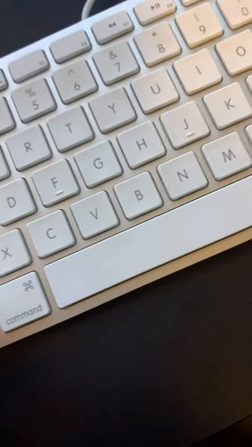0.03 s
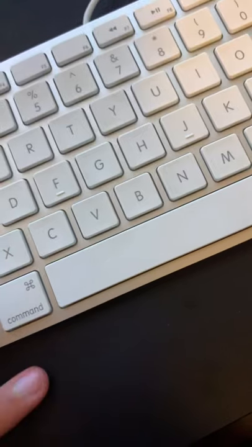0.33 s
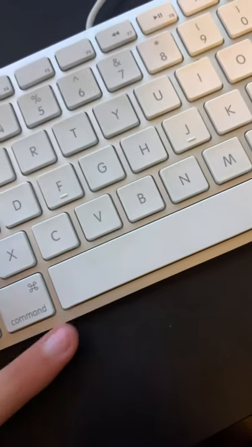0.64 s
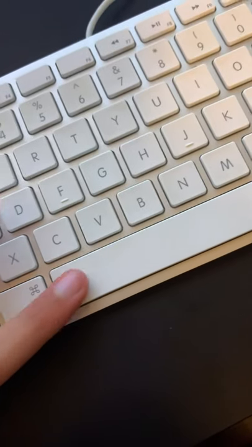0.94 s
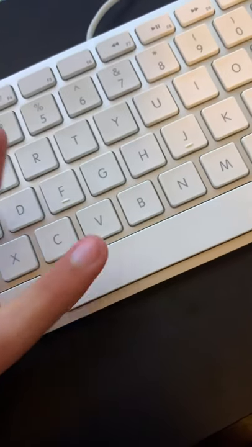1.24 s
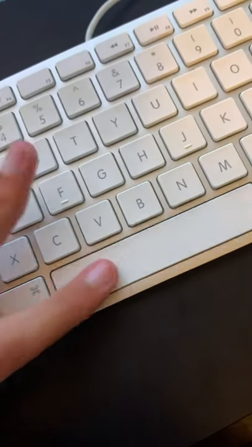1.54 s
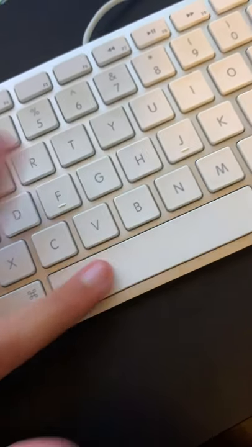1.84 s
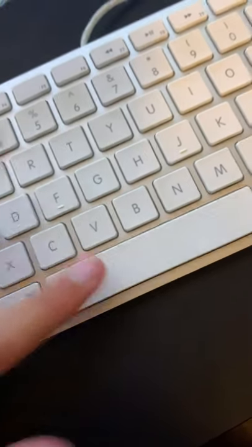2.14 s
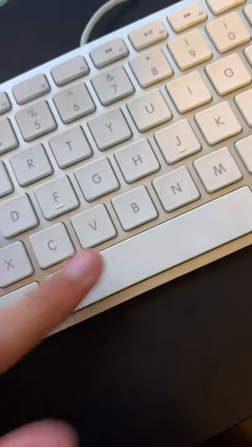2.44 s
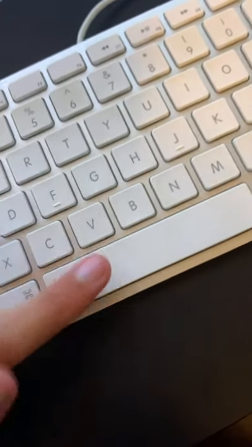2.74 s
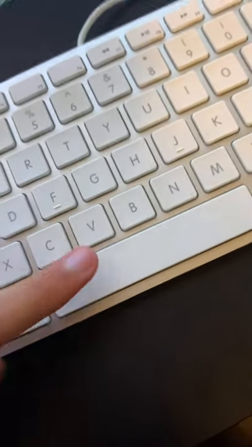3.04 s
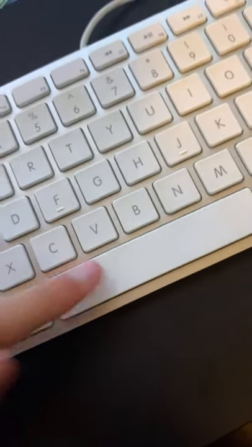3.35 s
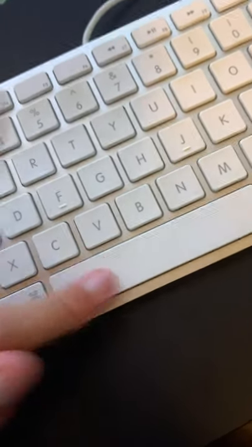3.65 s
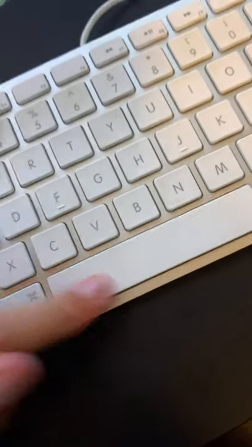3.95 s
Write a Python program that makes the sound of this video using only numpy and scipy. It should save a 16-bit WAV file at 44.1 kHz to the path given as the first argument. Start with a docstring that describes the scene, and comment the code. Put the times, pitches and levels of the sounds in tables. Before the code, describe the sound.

After a faint rustle and some soft knocks, a space bar is struck over and over at a quick, even pace. The close microphone catches plastic clacks, lighter return clicks and dull desk thumps in a quiet room.

```python
"""In a small quiet room, a finger taps the space bar of a flat desk keyboard 17 times, about six a second.
Each stroke is a series of impacts: the fingertip lands with a faint rattle, the bar clacks down, then
springs back with a lighter click. Clack and click excite the short plastic modes of the bar and the
low modes of the desk, heard as thumps. Before the typing come a short rustle, four soft knocks, two
tiny ticks and a brief hum. The impacts reverberate over a low room rumble."""
import sys
import numpy as np
from scipy import signal
from scipy.fft import rfft, irfft
from scipy.io import wavfile

SR = 44100
rng = np.random.default_rng(int(sys.argv[2]) if len(sys.argv) > 2 else 0)


def unload_audio(sound):
    """Save the sound as a 16-bit wav file, at the path given as the first command line argument."""
    columns = np.transpose(np.atleast_2d(sound))
    # keep every value between -1 and 1, then stretch to whole-number steps
    steps = np.round(np.clip(columns, -1, 1) * 32767)
    wavfile.write(sys.argv[1], SR, steps.astype(np.int16))


N = 176400
TIME = np.arange(N) / SR

# Levels in the tables are relative.
# the bar hits bottom: t/s, clack/dB, brightness/dB, thump/dB, lead of the fingertip/s, landing/dB
DOWNSTROKES = [(1.3831, -31, -1, -38.5, 0.01, -38), (1.5642, -31, -1.5, -39, 0.0065, -38.5),
               (1.729, -29.5, -3, -41, 0.006, -37), (1.883, -26, 1, -34, 0.0066, -36.5),
               (2.0473, -30, 7.5, -33, 0.0065, -37.5), (2.2058, -31, 4, -35.5, 0.0071, -41.5),
               (2.36, -33, -2, -35.5, 0.0066, -40), (2.5175, -31.5, 4.5, -36, 0.0073, -40.5),
               (2.6731, -34.5, -2, -39, 0.0073, -39.5), (2.8357, -35, 4.5, -41.5, 0.012, -44),
               (2.9924, -31.5, 5, -40.5, 0.0088, -43.5), (3.143, -31.5, 1, -37.5, 0.0086, -43.5),
               (3.2991, -29, 1.5, -37, 0.0078, -41.5), (3.454, -30.5, -1.5, -37.5, 0.007, -43),
               (3.6171, -30, -1, -40, 0.008, -40), (3.7741, -30.5, -1, -39.5, 0.0079, -38.5),
               (3.9173, -30, -4, -39.5, 0.0077, -41)]
# the bar springs back: t/s, click/dB, brightness/dB, thump/dB
UPSTROKES = [(1.4642, -35, -3, -33.5), (1.6305, -34, -3, -31.5), (1.7834, -34.5, -4, -33.5),
             (1.9535, -36.5, -0.5, -33), (2.1132, -34.5, -1, -34.5), (2.269, -36, -4.5, -33),
             (2.4213, -37, 0.5, -33.5), (2.5766, -37.5, -3.5, -35.5), (2.729, -36.5, 0, -39),
             (2.89, -35.5, -4.5, -38.5), (3.0514, -39, 3, -41.5), (3.209, -36.5, -1, -38),
             (3.365, -36.5, 2, -37), (3.524, -36.5, 1, -33.5), (3.681, -33.5, -0.5, -34),
             (3.8353, -34, 2, -35), (3.9806, -35.5, 1.5, -33)]
# modes of the plastic bar: f/Hz, T60/s, level/dB
PLASTIC_MODES = [(1220, 0.15, -20.5), (1340, 0.057, -14), (1670, 0.11, -13), (2480, 0.011, -15),
                 (2930, 0.0068, -8), (3750, 0.021, -20), (4020, .025, 2), (5110, 0.02, 6.5),
                 (5660, 0.015, -2.5), (7600, .012, -28), (9000, .012, -32), (12400, .008, -21)]
# modes of the keyboard on the desk: f/Hz, T60/s, level on press/dB, level on release/dB
THUMP_MODES = [(62.5, 0.65, -23.5, -31), (110.5, 0.26, -30.5, -31.5), (151.2, .14, -9.5, -8.5),
               (192, 0.087, -0.5, -4), (241, .06, -2, -9), (299.5, 0.069, -4, -4.5), (326.8, 0.11, 0, -3.5),
               (362.1, 0.065, -3.5, -11.5), (475.6, 0.088, -12.5, -20.5), (677.6, 0.072, -15.5, -30.5)]
# direct spectra of the contacts: f/Hz, level/dB
PRESS_SPECTRUM = [(40, -48), (200, -4.5), (500, -10), (800, -8), (1400, -2), (1900, -10), (2400, 2.5),
                  (3700, 3), (4400, -5.5), (5500, -1.5), (6500, -5), (9000, -10), (13000, -10.5),
                  (16000, -27)]
RELEASE_SPECTRUM = [(40, -49), (200, -2.5), (600, -14), (1300, -19), (2000, -25), (2800, -13.5), (3800, -2),
                    (4400, -8), (5300, 3.5), (6500, -5.5), (7700, -10), (9000, -9.5), (14000, -10.5),
                    (16000, -19)]
LANDING_SPECTRUM = [(200, -24), (700, -10), (2000, -20), (2800, 0), (4000, -6.5), (5500, 5.5), (7000, -3),
                    (9000, -4.5), (13000, -11), (16000, -7)]
# smoother spectra that the contacts radiate into the room: f/Hz, level/dB
PRESS_SPILL_SPECTRUM = [(40, -35), (500, -1.5), (800, -6), (2000, -4.5), (4200, 0.5), (5400, -2),
                        (6600, -2.5), (9000, -11), (15500, -18)]
RELEASE_SPILL_SPECTRUM = [(40, -44), (500, -2), (2000, -15), (4000, -0.5), (6500, 0), (9000, -9.5),
                          (15500, -11.5)]
# soft knocks nearby and faint touches on the keys: t/s, level/dB
SOFT_KNOCKS = [(0.377, -40), (.481, -41), (0.757, -59.5), (0.84, -62)]
KEY_TOUCHES = [(0.978, -64.5), (1.229, -65.5)]
# modes that the knocks excite: f/Hz, T60/s, level/dB
KNOCK_RESONANCES = [(198, 0.089, -10.5), (292, 0.028, -3.5), (350.4, 0.081, -0.5), (485, .05, -7),
                    (610, 0.052, -15.5), (964, 0.017, -23), (1243, 0.078, -24.5)]
# contact spectra of the knocks and touches: f/Hz, level/dB
SCUFF_SPECTRUM = [(60, -29), (400, 5), (1200, -3.5), (3000, -19), (14000, -37)]
TICK_SPECTRUM = [(300, 0), (2500, -24), (3800, -1.5), (5300, -2), (7500, -12.5), (14000, -18)]
# reverberation time of the room: f/Hz, T60/s
ROOM_T60 = [(150, 0.2), (800, 0.28), (3000, 0.26), (7000, .28), (15000, 0.2)]
# spectra of the room rumble, the rustle and the hum: f/Hz, level/dB
RUMBLE_SPECTRUM = [(25, -28), (45, -5.5), (62, 1), (85, -1.5), (130, -13), (220, -17), (400, -20.5),
                   (600, -23.5), (1100, -29.5), (1700, -33.5), (2150, -29), (2700, -37.5), (4000, -37),
                   (7000, -40.5), (12000, -48), (16000, -62)]
RUSTLE_SPECTRUM = [(59, -33), (100, -3), (373, -14.5), (461, -11), (818, -18), (1720, -22), (7290, -28.5),
                   (16000, -55)]
HUM_SPECTRUM = [(40, -24), (70, 16.5), (130, -10), (220, 0.5), (265, 7), (330, -9), (450, -19), (1500, -36),
                (8000, -50)]
# their envelopes: t/s, level/dB
RUMBLE_ENVELOPE = [(.06, -110), (0.082, -66.5), (.6, -67.5), (.9, -68), (1.4, -66), (4, -61.5)]
RUSTLE_ENVELOPE = [(.07, -110), (.08, -66), (0.105, -52), (.115, -61.5), (.145, -60), (.165, -85),
                   (.22, -110)]
HUM_ENVELOPE = [(.9, -98), (.98, -69.5), (1.05, -61), (1.17, -73), (1.26, -68), (1.34, -102)]

STOP_LAG_S, STOP_DB = 0.0005, 14  # the one hard contact within each clack
PRESS_THUMP_DB, PRESS_THUMP_LAG_S = 7.5, 0.001935
RELEASE_THUMP_DB, RELEASE_THUMP_LAG_S = 5.5, 0.00085
PRESS_SPILL_DB, RELEASE_SPILL_DB, THUMP_SPILL_DB, FAINT_SPILL_DB = -5, -6.5, -9, -6.5  # into the room
THUMP_HARDENING = 0.46  # spectral tilt in dB per octave for each dB of force
ROOM_GAP_S, WALL_DELAY_S, EARLY_GAIN = 0.0055, 0.018, 0.41


def presses():
    """Impact excitation: the finger lands, the bar hits bottom, the desk thumps. Gives (direct, spill)."""
    times, clack_db, bright_db, thump_db, lead_s, landing_db = np.transpose(DOWNSTROKES)
    landing = chatter(times - lead_s, landing_db - 1, attack_s=0.0016, hold_s=0.0035, decay_s=0.0044)
    contact = chatter(times, clack_db + 2, attack_s=0.00072, hold_s=0.0013, decay_s=0.0031)
    contact += impulses(times + STOP_LAG_S, clack_db + STOP_DB)
    modes_db = [mode[2] for mode in THUMP_MODES]
    thump = desk(times + PRESS_THUMP_LAG_S, thump_db + PRESS_THUMP_DB, modes_db)
    rattle = bar(landing, LANDING_SPECTRUM, ring_db=-7)
    clack = brighten(bar(contact, PRESS_SPECTRUM, ring_db=0), times, bright_db)
    spill = amp(PRESS_SPILL_DB) * colour(contact + landing, PRESS_SPILL_SPECTRUM)
    return rattle + clack + thump, spill + amp(THUMP_SPILL_DB) * thump


def releases():
    """Elastic return: the bar strikes its top stop and the desk rebounds. Gives (direct, spill)."""
    times, click_db, bright_db, thump_db = np.transpose(UPSTROKES)
    contact = chatter(times, click_db + 2, attack_s=0.00076, hold_s=0.0016, decay_s=0.0035)
    modes_db = [mode[3] for mode in THUMP_MODES]
    thump = desk(times + RELEASE_THUMP_LAG_S, thump_db + RELEASE_THUMP_DB, modes_db)
    click = brighten(bar(contact, RELEASE_SPECTRUM, ring_db=-5), times, bright_db)
    spill = amp(RELEASE_SPILL_DB) * colour(contact, RELEASE_SPILL_SPECTRUM)
    return click + thump, spill + amp(THUMP_SPILL_DB) * thump


def bar(contact, spectrum, ring_db):
    """Forced and free vibration: a contact gives a dry crack and rings the short plastic modes."""
    ringing = sum(amp(db) * ring(contact, hz, t60) / np.sqrt(t60 * SR) for hz, t60, db in PLASTIC_MODES)
    return colour(contact, spectrum) + amp(ring_db) * ringing


def desk(times, force_db, modes_db, spread_db=1.5, low_cut_hz=53):
    """Modal superposition: keyboard and desk thump, and harder blows favour the higher modes."""
    scatter_db = spread_db * rng.standard_normal((len(times), len(THUMP_MODES)))
    middle_hz = np.median(np.array(THUMP_MODES)[:, 0])
    thump = np.zeros(N)
    for k, ((hz, t60, *_), db) in enumerate(zip(THUMP_MODES, modes_db)):
        tilt_db = THUMP_HARDENING * (force_db - force_db.mean()) * np.log2(hz / middle_hz)
        blows = impulses(times, force_db + db + tilt_db + scatter_db[:, k])
        thump -= (-1) ** k * ring(blows, hz, t60)  # alternate signs let the thump build up
    return signal.sosfilt(signal.butter(2, low_cut_hz, "high", fs=SR, output="sos"), thump)


def chatter(times, db, attack_s, hold_s, decay_s):
    """Contact noise: dense micro-contacts of random sign rise, hold and decay at each event."""
    t = np.arange(-SR // 20, SR // 20) / SR
    burst = np.exp(np.minimum(t, 0) / attack_s - np.maximum(t - hold_s, 0) / decay_s)
    envelope = np.zeros(N + SR)
    for onset, gain in zip(times, amp(db)):
        start = int((onset + t[0]) * SR)
        envelope[start:start + len(t)] += gain * burst
    return envelope[:N] * rng.choice([-1, 1], N)


def impulses(times, db):
    """Ideal impacts: each force lasts one sample."""
    force = np.zeros(N)
    force[np.clip(np.round(times * SR).astype(int), 0, N - 1)] = amp(db)
    return force


def ring(force, hz, t60):
    """Damped oscillator: a unit impulse starts a decaying sine of height 1."""
    radius, angle = amp(-60 / (t60 * SR)), 2 * np.pi * hz / SR
    return signal.lfilter([0, np.sin(angle)], [1, -2 * radius * np.cos(angle), radius**2], force + 1e-18)


def brighten(x, times, bright_db, pivot_hz=3100):
    """Spectral tilt: each stroke's treble is weighed against the band below the pivot."""
    low = signal.sosfilt(signal.butter(1, pivot_hz, fs=SR, output="sos"), x)
    tilt = amp(np.interp(TIME, times, bright_db) / 2)
    return low / tilt + (x - low) * tilt


def colour(x, spectrum, size=8192):
    """Minimum-phase filtering: imposes the spectrum's shape, while white noise keeps its power."""
    gain = amp(at_hz(spectrum, np.arange(size // 2 + 1) * SR / size))
    cepstrum = irfft(np.log(gain))
    cepstrum[1:size // 2] *= 2  # folding the cepstrum makes the response causal
    cepstrum[size // 2 + 1:] = 0
    response = irfft(np.exp(rfft(cepstrum)))
    return signal.fftconvolve(x, response / np.linalg.norm(response))[:N]


def at_hz(curve, hz):
    """Interpolation on a logarithmic frequency axis."""
    freqs, values = np.transpose(curve)
    return np.interp(np.log(hz + 1), np.log(freqs), values)


def amp(db):
    """Decibel law: 20 dB is a tenfold amplitude."""
    return 10 ** (np.asarray(db) / 20)


def knocks():
    """Damped resonance: soft blows nearby ring low modes, each with a scuff of contact noise."""
    times, db = np.transpose(SOFT_KNOCKS)
    blows = impulses(times, db)
    ringing = sum((-1) ** k * amp(mode_db) * ring(blows, hz, t60)
                  for k, (hz, t60, mode_db) in enumerate(KNOCK_RESONANCES))
    scuff = chatter(times, db - 18.5, attack_s=0.0006, hold_s=0.0054, decay_s=0.0082)
    return ringing + colour(scuff, SCUFF_SPECTRUM)


def ticks():
    """Weak excitation: faint touches on the keys ring the plastic modes."""
    times, db = np.transpose(KEY_TOUCHES)
    contact = chatter(times, db, attack_s=0.0013, hold_s=0.003, decay_s=0.0027)
    return bar(contact, TICK_SPECTRUM, ring_db=2)


def room(spill):
    """Time-varying convolution: the echo changes from stroke to stroke as the hand moves."""
    times = np.array(DOWNSTROKES)[:, 0]
    reverberation = np.zeros(N)
    for stroke, response in zip(np.eye(len(times)), room_responses(len(times))):
        crossfade = np.sqrt(np.interp(TIME, times, stroke))  # equal power
        reverberation += signal.oaconvolve(spill * crossfade, response)[:N]
    return reverberation


def room_responses(count):
    """Diffuse field: noise decays exponentially band by band, weaker until the walls answer."""
    t = TIME[:SR // 2]
    noise = rfft(rng.standard_normal((count, len(t))))
    hz = np.arange(noise.shape[1]) * SR / len(t)
    edges_hz = np.geomspace(100, 17000, num=9)
    responses = 0
    for low, high in zip(edges_hz, edges_hz[1:]):
        band = irfft(noise * (hz >= low) * (hz < high), len(t))
        decay = amp(-60 * t / at_hz(ROOM_T60, np.sqrt(low * high)))
        responses += band * decay / np.linalg.norm(decay)
    return responses * np.where(t > WALL_DELAY_S, 1, EARLY_GAIN) * (t > ROOM_GAP_S)


def shaped_noise(spectrum, envelope):
    """Amplitude modulation: noise of a steady spectrum follows a level envelope."""
    level_db = np.interp(TIME, *np.transpose(envelope))
    return colour(rng.standard_normal(N), spectrum) * amp(level_db)


def background():
    """Incoherent addition: room rumble, the opening rustle and a low hum are independent noises."""
    rumble = shaped_noise(RUMBLE_SPECTRUM, RUMBLE_ENVELOPE)
    rustle = shaped_noise(RUSTLE_SPECTRUM, RUSTLE_ENVELOPE)
    hum = shaped_noise(HUM_SPECTRUM, HUM_ENVELOPE)  # swells as the hand comes in
    return rumble + rustle + hum


def scene():
    """Superposition: direct sound, reverberation and background add at one close microphone."""
    press, press_spill = presses()
    release, release_spill = releases()
    faint = knocks() + ticks()
    spill = press_spill + release_spill + amp(FAINT_SPILL_DB) * faint
    return (press + release + faint + room(spill) + background())[None]


def record(dry, cutoff_hz=16000):
    """Band limiting: an elliptic low-pass cuts the top steeply."""
    return signal.sosfilt(signal.ellip(10, 0.2, 80, cutoff_hz, fs=SR, output="sos"), dry)


dry = scene()
out = record(dry)
unload_audio(out)
```